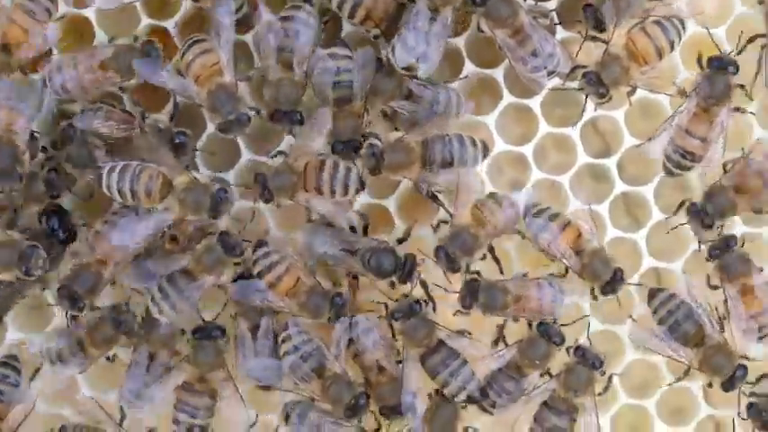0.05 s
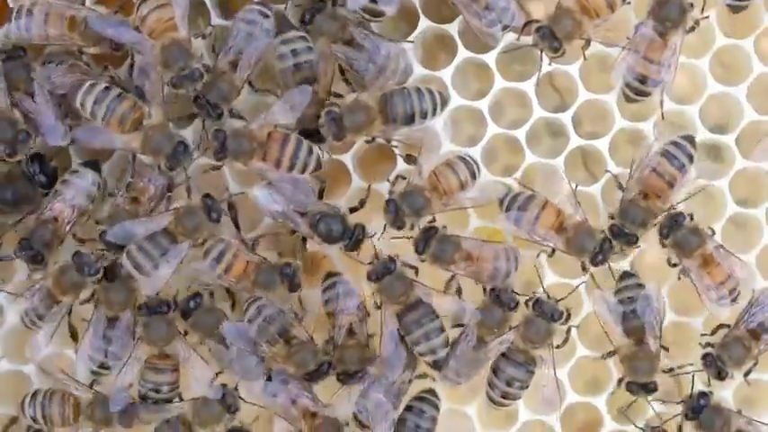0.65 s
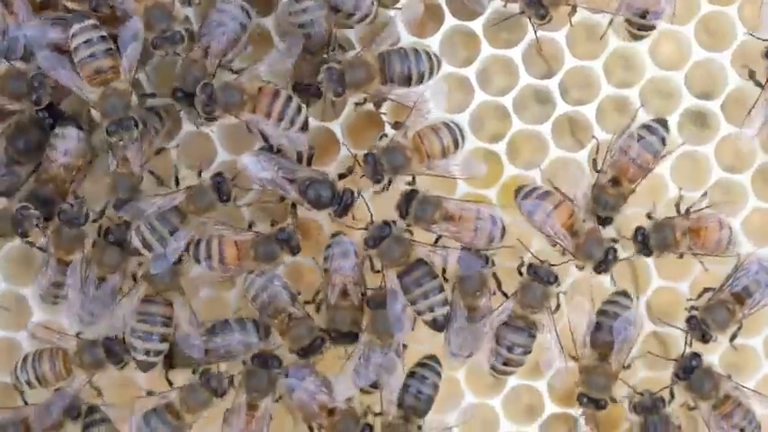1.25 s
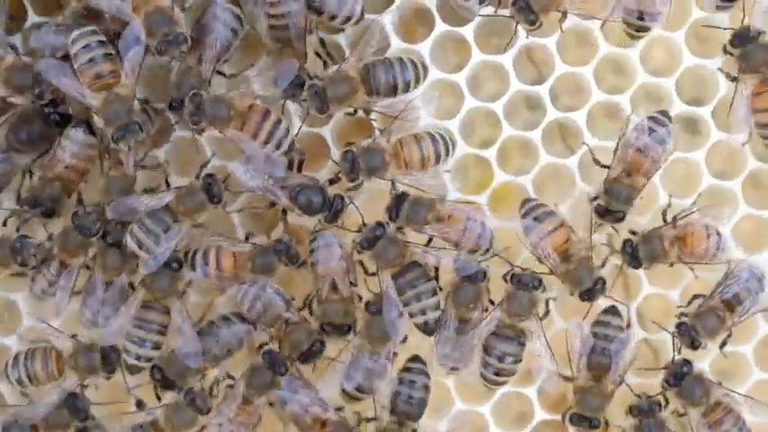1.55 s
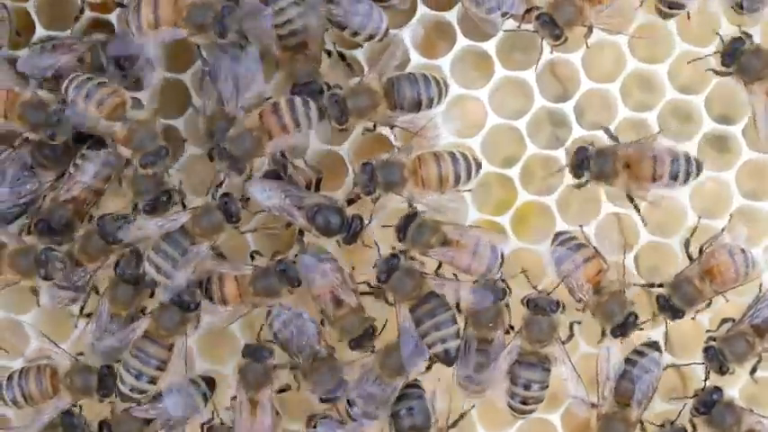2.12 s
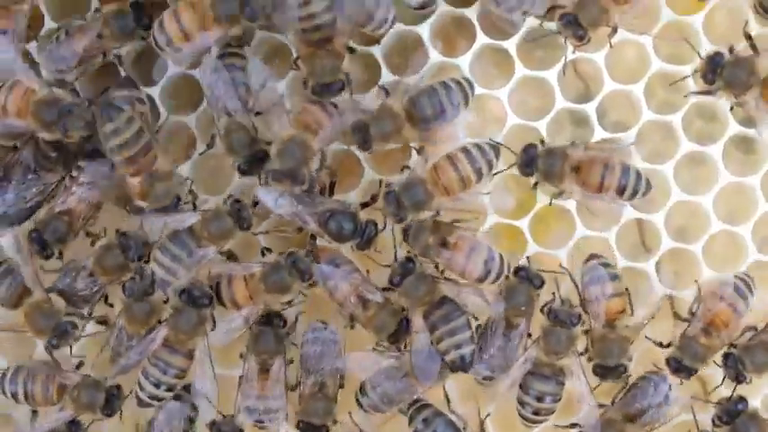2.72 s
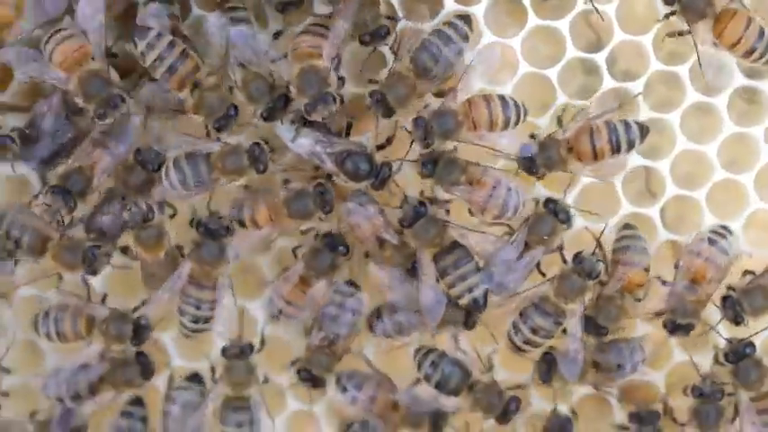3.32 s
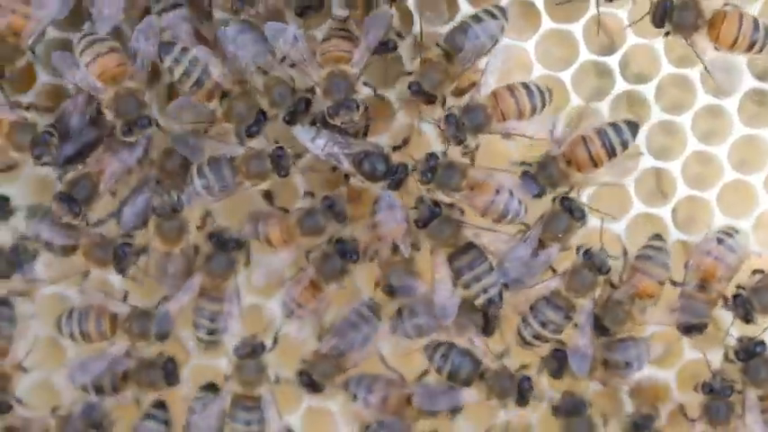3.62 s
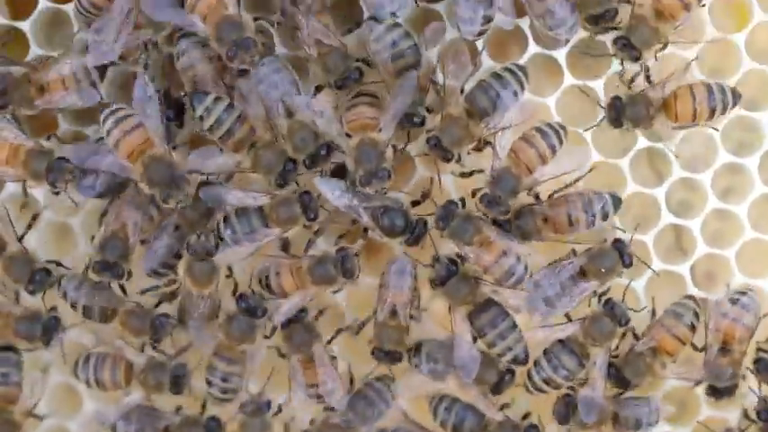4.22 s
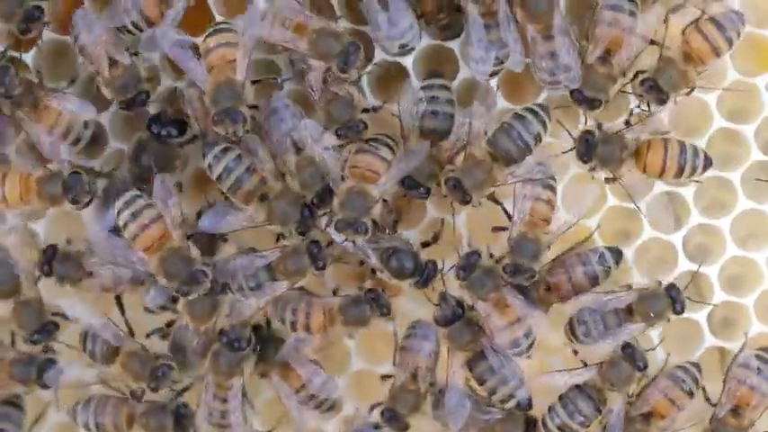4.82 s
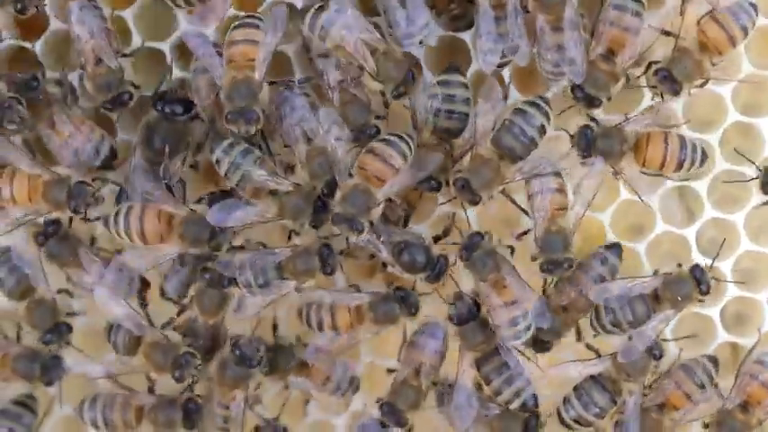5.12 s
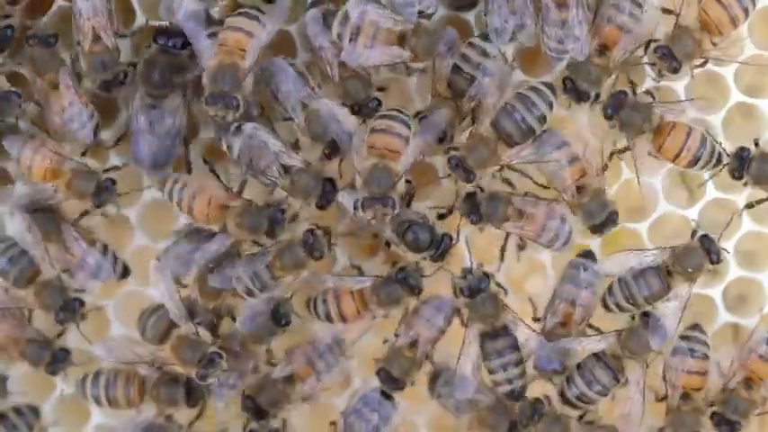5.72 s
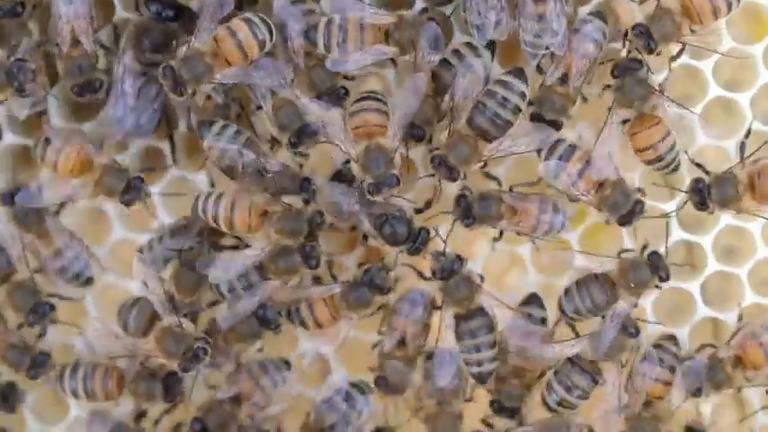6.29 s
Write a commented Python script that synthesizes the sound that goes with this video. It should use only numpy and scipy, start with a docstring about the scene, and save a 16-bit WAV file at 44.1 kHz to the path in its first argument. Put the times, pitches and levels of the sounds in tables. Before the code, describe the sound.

A honeybee colony hums steadily close by, while a breeze rumbles on the microphone and fades, with faint birds behind.

```python
"""Outdoors at an open beehive, close to a frame of honeybees.
Dozens of wingbeat pulse trains merge into a warm hum with a soft buzz on top. A few fanning bees hold
clear notes, and feet and wings tick on the comb. Breeze eddies rumble on the microphone and die away.
Behind them sit a few soft rasps, the gliding whistles of small far-off birds and a bed of open air."""
import sys
import numpy as np
from scipy import signal
from scipy.fft import rfft, irfft, next_fast_len
from scipy.io import wavfile
from scipy.ndimage import uniform_filter1d

SR = 44100
rng = np.random.default_rng(int(sys.argv[2]) if len(sys.argv) > 2 else 0)


def generate_wav(sig):
    """Save sig (samples, or channels by samples) to the path in sys.argv[1] as 16-bit PCM at SR."""
    pcm = np.round(np.clip(np.atleast_2d(sig).T, -1, 1) * 32767).astype(np.int16)
    wavfile.write(sys.argv[1], SR, pcm)


N = 280035
T = np.arange(N) / SR

# the colony's swell: t/s, relative hum level/dB, relative buzz level/dB
COLONY_SWELL = [(0, -49, -54.5), (.8, -49.5, -54.5), (2.0, -45.5, -51.5), (3.8, -47, -50.5),
                (4.6, -44, -51), (6.35, -45.5, -49.5)]
# the crowd's middle wingbeat rate: t/s, f/Hz
WINGBEAT_RATE = [(0, 222.8), (3.1, 223.6), (4.2, 216.2), (6.35, 213.9)]
# EQ for the body and the edge of the wingbeats: f/Hz, level/dB
HUM_EQ = [(100, -12.5), (190, -8.5), (250, -6.5), (350, 0), (400, 2), (480, -1.5), (540, -8.5),
          (700, -60.5), (1500, -76.5)]
BUZZ_EQ = [(400, -15), (560, -3), (700, -1), (930, 3), (1250, 0.5), (1550, -15.5), (2100, -17.5),
           (2700, -21.5), (4000, -32.5), (8000, -48.5)]
# the nearest fanning bee: t/s, wingbeat f/Hz, relative level/dB
NEAR_FANNER = [(0, 304, -51), (0.55, 318, -49), (1.45, 311, -51.5), (2.0, 317.4, -45.5), (2.65, 310, -46),
               (3.27, 306.5, -46.5), (3.4, 314, -46), (3.72, 308.2, -48), (3.93, 318.6, -44.5),
               (4.35, 315, -46), (5.18, 308.4, -45), (5.26, 307, -48.5), (5.6, 310, -47),
               (5.98, 314.6, -45.5), (6.35, 306, -46)]
# a deeper bee's bouts of fanning: t/s, length/s, level/dB
FANNING_BOUTS = [(2.5, 0.69, -49.5), (3.882, 0.77, -51.5), (5.502, 0.87, -58.5)]
# low held notes inside the hive: f/Hz, level/dB, waver/share of pitch
HIVE_DRONES = [(130.4, -49.5, 0.01213), (117.45, -53, .015), (95.8, -55.5, 0.01), (167.1, -59, .04),
               (241.8, -66.5, .025), (342.2, -55, 0.044)]
# EQ for the ticks on the wax: f/Hz, level/dB
RUSTLE_EQ = [(800, -37.5), (2500, 2), (5000, 5.5), (7500, -17), (15000, -12.5)]
# the breeze's strength: t/s, relative level/dB
GUSTS = [(0.0, -22), (0.03, -29.5), (0.07, -20), (0.44, -26.5), (0.51, -20.5), (1.15, -23.5), (1.25, -13.5),
         (1.36, -23.5), (1.98, -25), (2.42, -33), (2.74, -27), (2.79, -31), (3.08, -33), (3.64, -35.5),
         (3.77, -29.5), (3.8, -39.5), (5.06, -48), (6.35, -47)]
# EQ for large and small eddies: f/Hz, level/dB
RUMBLE_EQ = [(4, -13.5), (12, 4.5), (21, -2.5), (30, -8), (50, -9.5), (68, -24.5), (110, -47), (300, -93)]
EDDY_EQ = [(30, -27), (62, 6.5), (100, 1), (140, -8), (200, -16), (300, -24.5), (700, -74.5)]
# puffs on the microphone: peak t/s, length/s, centre f/Hz, level/dB
PUFFS = [(0.541, 0.019, 91.5, -26), (1.2, 0.17, 113, -36.5), (1.26, 0.065, 34.9, -17.5),
         (1.65, 0.42, 72, -30.5), (2.591, 0.1, 154, -37), (2.71, 0.47, 184, -45), (3.06, 0.33, 161, -41.5),
         (3.257, 0.19, 111, -38), (4.142, 0.11, 142, -37.5), (4.38, 0.057, 66, -34),
         (4.599, 0.058, 130, -35), (5.872, 0.037, 64.8, -37)]
# EQ for one puff: f/multiple of centre, level/dB
PUFF_EQ = [(.25, -14), (1, 0), (1.5, -6), (4, -42), (20, -90), (60, -130)]
# soft rasps: peak t/s, length/s, centre f/Hz, width/share of centre, level/dB
RASP_SWELLS = [(2.661, 0.066, 647, 0.048, -45), (3.94, 0.2, 3214, 0.11, -62.5),
               (3.96, 0.21, 4700, 0.16, -71), (3.974, 0.77, 1395, 0.093, -55.5),
               (4.1, 0.74, 3400, 0.11, -69.5)]
# EQ for one rasp: offset from centre/widths, level/dB
RASP_EQ = [(-4, -60), (-1, -6), (0, 0), (1, -6), (4, -60)]
# rising and falling bird notes: t/s, length/s, start f/Hz, end f/Hz, relative level/dB
BIRD_SWEEPS = [(.455, 0.033, 2240, 2510, -60.5), (.568, 0.053, 4230, 3920, -71.5),
               (.705, 0.022, 3320, 3070, -61), (.735, .045, 4100, 4620, -75),
               (.785, .03, 3870, 4400, -71.5), (0.798, .047, 3430, 2800, -63),
               (1.126, 0.035, 3320, 2750, -66), (1.635, .02, 3300, 2950, -72),
               (1.683, 0.051, 3190, 3040, -67.5), (1.82, 0.026, 3490, 3220, -65),
               (1.83, 0.035, 2935, 3060, -66), (1.956, 0.025, 3150, 2440, -63),
               (4.26, 0.029, 3140, 2430, -65.5), (4.514, 0.024, 3000, 2270, -63.5),
               (4.594, .024, 2797, 2980, -62.5), (4.633, .025, 3440, 2740, -65),
               (4.672, .015, 3770, 2920, -63), (4.75, .03, 3030, 2440, -66),
               (4.828, 0.0234, 2810, 2310, -66), (5.295, 0.025, 2750, 3720, -63),
               (5.49, 0.0325, 2780, 3420, -63.5), (5.54, .028, 4237, 4040, -67.5),
               (5.69, 0.023, 2800, 3400, -64), (5.742, .016, 2900, 3280, -68),
               (5.83, .044, 3310, 2720, -63.5), (5.906, 0.032, 3650, 2540, -64.5),
               (6.034, 0.06, 3720, 3220, -66), (6.234, 0.04, 4050, 3070, -63),
               (6.254, 0.021, 2630, 2220, -64)]
# short arched chips: t/s, f/Hz, relative level/dB
BIRD_CHIPS = [(1.157, 4200, -77), (1.237, 4240, -73.5), (2.21, 3650, -66), (2.51, 3560, -66),
              (2.888, 3620, -61), (3.216, 3580, -64), (3.485, 3471, -68), (3.64, 3620, -68),
              (4.13, 3510, -65), (4.886, 3320, -60.5), (5.012, 4480, -72), (5.013, 3820, -68),
              (5.248, 3070, -60), (5.445, 3660, -68), (6.228, 3080, -64)]
# held whistles: t/s, length/s, start f/Hz, relative level/dB
BIRD_WHISTLES = [(0.123, 0.054, 4420, -73.5), (0.412, 0.047, 3660, -72), (.515, 0.1, 4220, -75),
                 (0.558, 0.02, 3620, -69), (0.596, 0.057, 3390, -71.5), (0.922, 0.045, 3320, -67),
                 (.965, 0.03, 3710, -71), (0.993, 0.04, 3480, -64), (1.272, 0.065, 3274, -66.5),
                 (1.464, 0.22, 3476, -68), (1.877, 0.046, 2950, -69.5), (3.895, 0.1, 3160, -66),
                 (5.077, 0.0484, 3325, -64.5)]
# one bird's high double tick: t/s, length/s, glide start f/Hz, glide end f/Hz, level/dB
BIRD_TICKS = [(.2995, 0.0061, 5840, 7260, -67.5), (0.306, .011, 5620, 8200, -69.5)]
# EQ for open air and far insects: f/Hz, level/dB
AIR_EQ = [(40, 10), (160, 26), (280, 23.5), (600, 16.5), (1500, 11.5), (2400, 1), (3300, -0.5), (3950, -5),
          (4600, -5), (5200, -8.5), (6500, -14.5), (9000, -18.5), (15000, -22.5)]
INSECT_EQ = [(3900, -46), (4400, 5), (4570, 2), (4750, -6), (5400, -55)]
# the tones of a thin whine: f/Hz, level/dB
WHINE_TONES = [(2030, -77), (2828, -83), (3534, -85), (3949, -91)]


def colony():
    """The crowd's wingbeats: two low partials carry the hum, the higher ones blur into a soft buzz."""
    hum_db, buzz_db = curves(COLONY_SWELL)
    pulses = wingbeats(spread=.14, waver=.018, restless_db=1.5)
    hum = colour(pulses, HUM_EQ) * undb(hum_db + 2.5)
    buzz = colour(pulses, BUZZ_EQ) * undb(buzz_db + 1.02)
    return hum + buzz


def wingbeats(spread, waver, restless_db, count=56):
    """One pulse per wing stroke; every bee has its own rate, wavers, and swells and fades."""
    t, middle_hz = T[::128], curves(WINGBEAT_RATE)[0][::128]
    pulses = np.zeros(N + 2)
    # most bees keep near the middle rate, few stray far
    for detune in np.arcsin(np.linspace(-1, 1, count + 2)[1:-1]):
        hz = middle_hz * (1 + spread * detune + waver * walk(6, t))
        cycles = np.cumsum(hz) * t[1] + rng.random()
        stroke_s = np.interp(np.arange(2, cycles[-1]), cycles, t)
        strength = undb(restless_db * walk(3.5, stroke_s))
        sample, fraction = np.divmod(stroke_s * SR, 1)
        pulses[sample.astype(int)] += strength * (1 - fraction)
        pulses[sample.astype(int) + 1] += strength * fraction
    return pulses


def fanners():
    """Solo wings over the hive's drones: two close notes beat together, a deeper bee fans in bouts."""
    hz, db = curves(NEAR_FANNER)
    near = held_tone(hz, db - .2, waver=.0071, flutter_db=1.25, overtone_db=-31)
    neighbour = held_tone(323, db - 9.5, waver=.0282, flutter_db=1.5, overtone_db=-31.5)
    rest_db, attack_s, release_s = -57.5, .075, .48
    effort = undb(rest_db)
    for s, length, bout_db in FANNING_BOUTS:
        ramps = np.minimum((T - s) / attack_s, 1 - (T - s - length) / release_s)
        effort = effort + undb(bout_db) * np.clip(ramps, 0, 1)
    deep = effort * held_tone(hz=194.3, db=0, waver=.006, flutter_db=2.5, overtone_db=-17)
    drones = sum(held_tone(f, level_db, waver, flutter_db=3.5, overtone_db=-18)
                 for f, level_db, waver in HIVE_DRONES)
    return near + neighbour + deep + drones


def held_tone(hz, db, waver, flutter_db, overtone_db):
    """A bee-like note: strong fundamental, weak overtones, unsteady in pitch and level."""
    phase = 2 * np.pi * np.cumsum(hz * (1 + waver * walk(14))) / SR
    overtones = sum(np.sin(k * phase) * 2 / k for k in (2, 3, 4))
    tone = np.sin(phase) + undb(overtone_db) * overtones
    return unit(tone * undb(flutter_db * walk(16))) * undb(db)


def rustle(per_second, scatter_db, db):
    """Feet and wings on the wax: a fine grain of ticks that fades up at the start."""
    hits = rng.random(N) < per_second / SR
    ticks = hits * rng.standard_normal(N) * undb(scatter_db * rng.random(N))
    fade_db = np.interp(T, [0, 1.5], [-6, 0])
    return colour(ticks, RUSTLE_EQ) * undb(db + 4.6 * walk(3.6) + fade_db)


def breeze():
    """Large eddies rumble on the microphone, small ones flutter above; the same gusts drive both."""
    gust_db, = curves(GUSTS)
    full_gust_db, eddy_growth = -20, .69  # small eddies grow more slowly than the rumble
    eddy_db = -35.5 + eddy_growth * (gust_db - full_gust_db) + 4.5 * walk(12)
    rumble = noise(RUMBLE_EQ)
    # flatten the rumble so the gusts shape its level
    rumble /= np.sqrt(uniform_filter1d(rumble ** 2, size=5000))
    wind = rumble * undb(gust_db + 3.5) + noise(EDDY_EQ) * undb(eddy_db)
    return signal.sosfiltfilt(signal.butter(2, 600, "low", fs=SR, output="sos"), wind)


def buffets():
    """Puffs of air hit the microphone as brief, dull swells of low noise."""
    return sum(noise([(hz * ratio, eq_db) for ratio, eq_db in PUFF_EQ]) * swell(s, length, db)
               for s, length, hz, db in PUFFS)


def rasps():
    """Narrow bands of noise ease in and out."""
    return sum(noise([(hz * (1 + width) ** k, eq_db) for k, eq_db in RASP_EQ]) * swell(s, length, db)
               for s, length, hz, width, db in RASP_SWELLS)


def birds(trim_db):
    """Sweeps, chips and whistles over two spells of twitter; leaves smear them, far trunks add a tail."""
    song = sum(bird_note(s, length, hz, db, glide=end_hz / hz - 1)
               for s, length, hz, end_hz, db in BIRD_SWEEPS)
    song += sum(bird_note(s, length=.024, hz=hz, db=db, arch=.066) for s, hz, db in BIRD_CHIPS)
    whistles = sum(bird_note(s, length, hz, db, glide=.025, warble=.003, flutter_db=.5)
                   for s, length, hz, db in BIRD_WHISTLES)
    twitter = flock(first_s=.25, last_s=1.6, centre_hz=3560, glide=.084, db=-71.5, count=10)
    twitter += flock(first_s=3.6, last_s=7, centre_hz=3180, glide=.2013, db=-69.5, count=48)
    leaves = reverb(song, t60=.12, db=-8)
    trunks = reverb(song, t60=1.1, db=-6.5) + reverb(whistles, t60=1.2, db=-4)
    return undb(trim_db) * (song + whistles + leaves + trunks + reverb(twitter, t60=.14, db=.5))


def high_call():
    """One bird's sharp double tick: two very quick upward sweeps with a short tail."""
    call = sum(bird_note(s, length, hz, db, glide=end_hz / hz - 1, arch=.065, warble=.0066)
               for s, length, hz, end_hz, db in BIRD_TICKS)
    return call + reverb(call, t60=.24, db=0)


def flock(first_s, last_s, centre_hz, glide, db, count, spread=.15):
    """Birds further off scatter faint, quick sweeps at random."""
    twitter = np.zeros(N)
    for when, length, pitch, slope, distance in rng.random((count, 5)):
        s = first_s + when * (last_s - first_s)
        hz = centre_hz * (1 + spread * (2 * pitch - 1))
        twitter += bird_note(s, .016 + .026 * length, hz, db - 5 * distance, glide * (2 * slope - 1))
    return twitter


def bird_note(s, length, hz, db, glide=0, arch=0, warble=.013, flutter_db=2):
    """A fluttering whistle with a fast attack; glide, arch and warble bend it by shares of its pitch."""
    attack_s, release_s = .008, .011
    progress = np.linspace(0, 1, int(length * SR))
    t = progress * length
    bend = glide * progress + arch * (np.sin(np.pi * progress) - np.pi / 4)
    phase = 2 * np.pi * np.cumsum(hz * (1 + bend + warble * walk(260, t))) / SR
    envelope = np.sqrt(np.tanh(t / attack_s) * np.tanh((length - t) / release_s))
    tone = unit(np.sin(phase) * envelope * undb(flutter_db * walk(170, t))) * undb(db)
    return np.pad(tone, (int(s * SR), N))[:N]


def outdoors():
    """The ambience bed: open air and a thin ring of far insects fade up under a faint whine."""
    air = noise(AIR_EQ) * undb(-48.5 + .64 * walk(9.6))
    insects = noise(INSECT_EQ) * undb(-81 + 2 * walk(13))
    whine = sum(held_tone(hz, db, waver=.0006, flutter_db=6, overtone_db=-65) for hz, db in WHINE_TONES)
    fade_db = np.interp(T, [0, 2.2], [-4.2, .1])
    return (air + insects) * undb(fade_db) + whine


def reverb(x, t60, db):
    """Scattered reflections, wet only, that fall 60 dB in t60 seconds."""
    tail = (rng.standard_normal(N) * undb(-60 * T / t60))[T < t60]
    return signal.fftconvolve(x, tail / np.linalg.norm(tail))[:N] * undb(db)


def swell(s, length, db):
    """A bell-shaped fade that peaks at s seconds."""
    return undb(db) * np.exp(-(2 * (T - s) / length) ** 2)


def noise(eq):
    """White noise through an EQ curve; rms 1."""
    return colour(rng.standard_normal(N), eq)


def colour(x, eq):
    """Apply an EQ curve (f/Hz, level/dB); rms 1."""
    hz, db = np.transpose(eq)
    size = next_fast_len(N)
    bin_hz = np.maximum(np.fft.rfftfreq(size, 1 / SR), 1)
    gain = undb(np.interp(np.log(bin_hz), np.log(hz), db))
    return unit(irfft(rfft(x, size) * gain, size)[:N])


def walk(rate, t=T):
    """A random modulator with `rate` steps a second; spread near 1."""
    steps = rng.standard_normal(1024)
    return np.interp(t * rate + rng.random(), np.arange(len(steps)), steps)


def curves(table):
    """A table's columns as straight-line automation over time."""
    s, *columns = np.transpose(table)
    return [np.interp(T, s, column) for column in columns]


def undb(db):
    """Decibels to gain."""
    return 10 ** (np.asarray(db) / 20)


def unit(x):
    """Scale to rms 1."""
    return x / np.sqrt(np.mean(x ** 2))


def scene():
    """The mono mix: bees and breeze up front, birds and open air behind."""
    bees = colony() + fanners() + rustle(per_second=300, scatter_db=5.5, db=-80)
    return (bees + breeze() + buffets() + rasps() + birds(trim_db=1) + high_call() + outdoors())[None]


def record(dry):
    """A steep high cut takes off the very top."""
    cutoff_hz = 15700
    return signal.sosfilt(signal.ellip(10, .1, 80, cutoff_hz, fs=SR, output="sos"), dry)


dry = scene()
out = record(dry)
generate_wav(out)
```